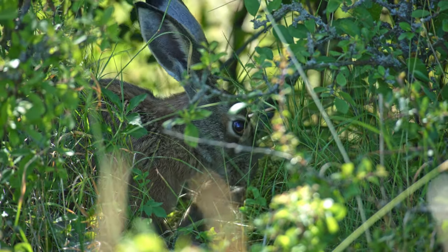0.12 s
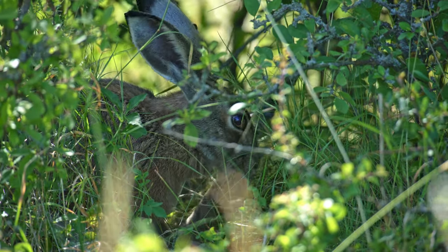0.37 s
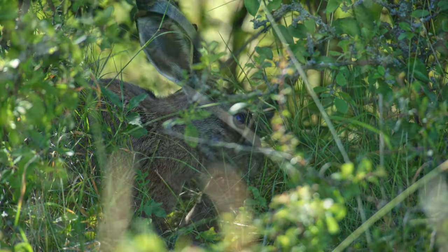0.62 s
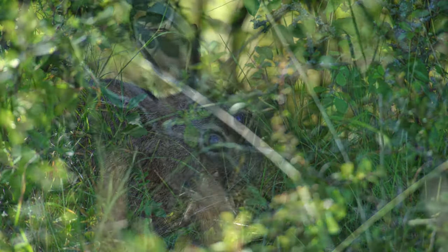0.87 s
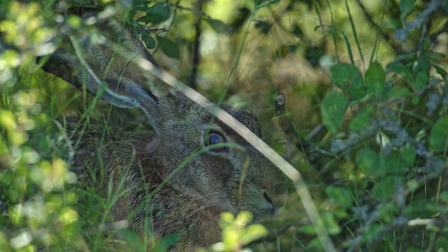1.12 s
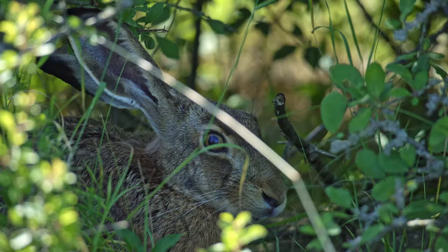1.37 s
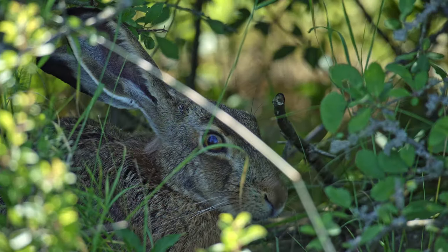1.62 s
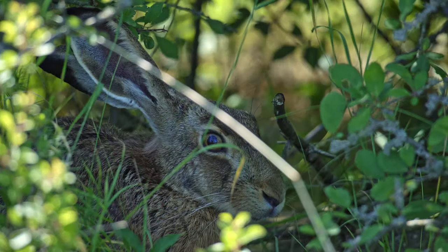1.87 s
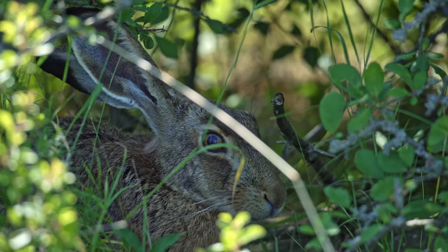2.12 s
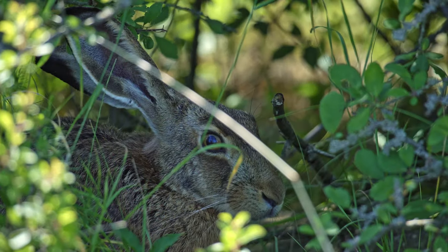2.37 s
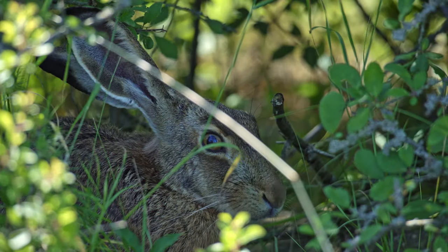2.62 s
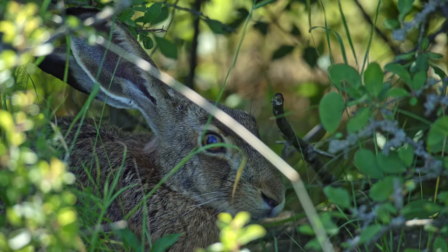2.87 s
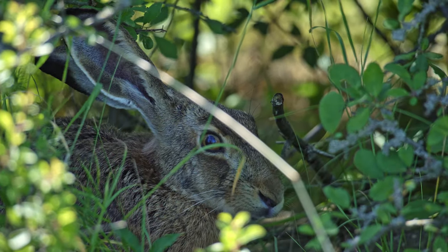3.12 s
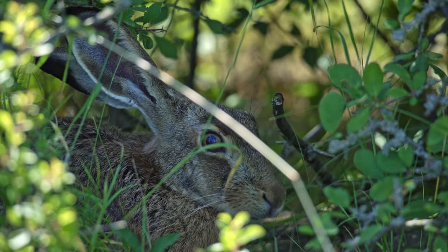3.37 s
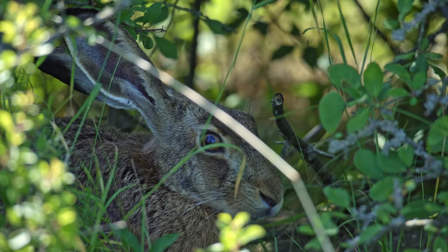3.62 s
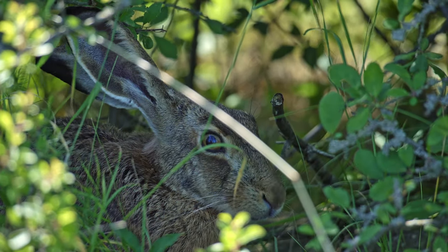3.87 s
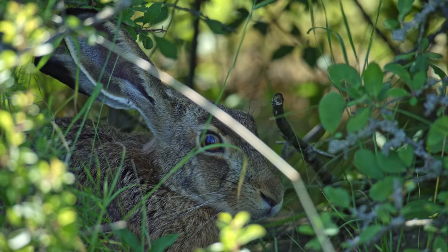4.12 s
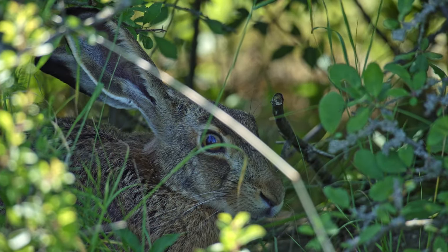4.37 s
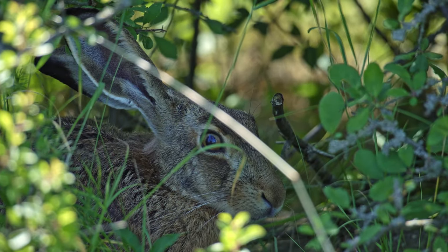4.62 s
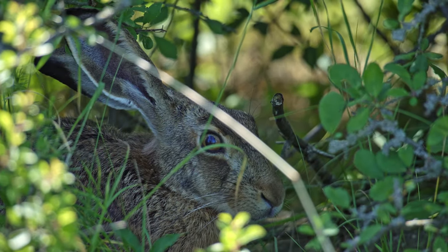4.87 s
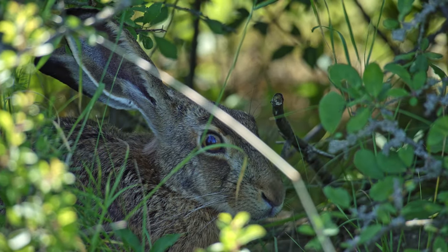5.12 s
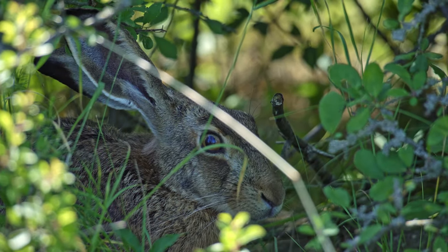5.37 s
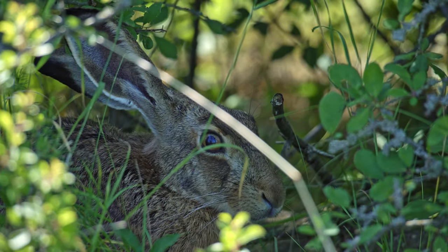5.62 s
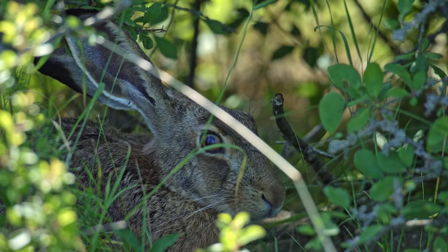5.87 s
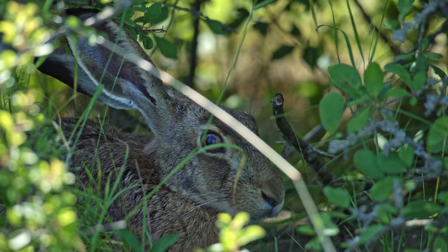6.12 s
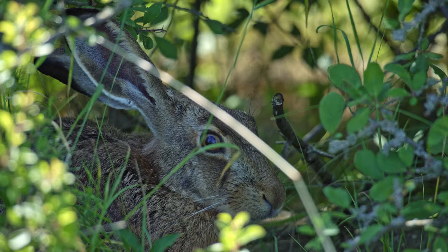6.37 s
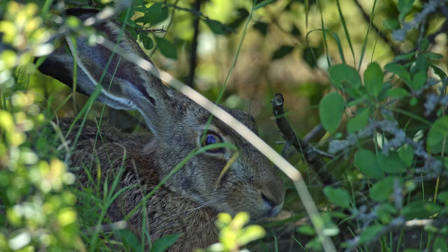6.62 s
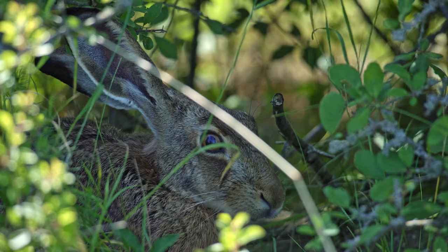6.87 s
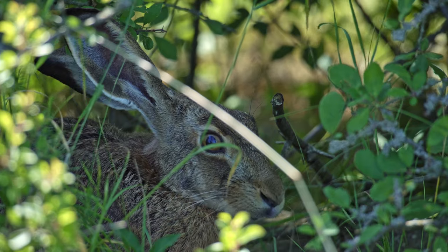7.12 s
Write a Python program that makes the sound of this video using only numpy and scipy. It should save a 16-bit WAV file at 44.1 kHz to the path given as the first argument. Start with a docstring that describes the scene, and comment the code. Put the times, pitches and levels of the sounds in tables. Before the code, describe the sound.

A lively birdsong scene beside a summer hedge, in stereo, with the singers on the left drifting slightly towards the middle. At 0-1 s a falling whistle, a soft warble and a quick chirruping trill lead to a swelling buzz. From 1 to 2 s come sharp chirps and a long descending trill. Between 2 and 3.6 s, rippling low trills, bright fast ones, arcing whistles and small pips follow closely. Around 3.6 s notes bounce up and down; by 3.9-4.7 s an earlier phrase returns. A tiny twig snap at 4.7 s precedes a faint grasshopper buzz, around 5-5.5 s. A dry rattle and falling swoop come at 5.5 s, then low whistles, and whipping notes at 6.3 s. Short trills continue to the end, 7.2 s. Wind rumbles in puffs, notably at 2-3.3 and 6-6.3 s, over quiet leaves and high cricket shimmer.

```python
"""Birdsong over a summer hedge

A lark and a lower-voiced songbird sing from the left in whistles, trills, warbles, a rattle and a swoop:
sines of gliding pitch with a weak octave; the bushes return a faint short echo, made by convolution with noise.
Gusts rumble on the microphones, leaves murmur and bush crickets shimmer at the top of hearing: shaped noise.
A grasshopper's faint buzz is narrow-band noise, and a snapping twig is two damped sines."""
import sys
import numpy as np
from scipy import signal
from scipy.fft import rfft, irfft
from scipy.io import wavfile
from scipy.ndimage import uniform_filter1d

SR = 44100
rng = np.random.default_rng(int(sys.argv[2]) if len(sys.argv) > 2 else 0)


def generate_wav(sig):
    """Save sig (samples, or channels by samples) to the path in sys.argv[1] as 16-bit PCM at SR."""
    pcm = np.round(np.clip(np.atleast_2d(sig).T, -1, 1) * 32767).astype(np.int16)
    wavfile.write(sys.argv[1], SR, pcm)


def volts_from_decibels(level):
    """Turn decibel levels (scalar or array-like) into linear amplitude factors."""
    exponent = np.asarray(level, float) / 20
    return 10 ** exponent


N = 319284  # samples in the scene


def colour(points, channels=1):
    """Spectral shaping: white noise takes the outline of (frequency_hz, density_db) points, at rms 1."""
    hz, db = np.transpose(points)
    log_hz = np.log(np.fft.rfftfreq(N, 1 / SR) + 1)
    gain = volts_from_decibels(np.interp(log_hz, np.log(hz), db))
    noise = irfft(rfft(rng.standard_normal((channels, N))) * gain, N)
    return noise / noise.std()


def walk(rate):
    """Slow random fluctuation: levels drawn rate times a second, slewed twice, with a spread near 1."""
    hold = int(SR / rate)
    steps = np.repeat(rng.standard_normal(N // hold + 1), hold)
    return 1.3 * uniform_filter1d(uniform_filter1d(steps, hold), hold)[:N]


def curve(table):
    """Linear interpolation: straight lines join (time_s, value) rows."""
    return np.interp(np.arange(N) / SR, *np.transpose(table))


def spread(pair, likeness):
    """Interchannel correlation: two unrelated noises become left and right of the given likeness."""
    likeness = np.clip(likeness, 0, 1)
    common = np.sqrt((1 + likeness) / 2) * pair[0]
    opposed = np.sqrt((1 - likeness) / 2) * pair[1]
    return common + opposed * np.array([[1], [-1]])


def along(length_ms):
    """Normalized time: progress 0-1 through a note."""
    return np.linspace(0, 1, int(length_ms * SR / 1000))


def bent(first_hz, last_hz, bend):
    """Pitch contour: the pitch at start, middle and end of a note or trill."""
    # how a pitch travels, by name of bend: share of the way done at half time (0-1), bow (share of mean pitch)
    bends = {"even": (0.53, 0), "early": (.85, 0), "late": (0.144, 0), "lean": (0.71, 0),
             "sag": (0.51, -0.046), "dip": (0.43, -0.15), "arch": (0.41, 0.17), "surge": (0.125, 0)}
    share, bow = bends[bend]
    middle_hz = first_hz + share * (last_hz - first_hz) + bow * (first_hz + last_hz) / 2
    return first_hz, middle_hz, last_hz


def sing(song, start_s, hz, size):
    """Interaural time and level difference: a sine with a weak octave reaches the right later and softer."""
    # the singers drift towards the middle: time_s, left_lead_ms
    lead = [(0, 0.097), (3, 0.076), (6.3, 0.053), (7.24, 0.023)]
    octave = volts_from_decibels(-38)
    at = int(start_s * SR)
    count = min(len(hz), N - at)
    hz, size = hz[:count], size[:count]
    phase = 2 * np.pi * (np.cumsum(hz) / SR + start_s * 1000)
    lag = 2 * np.pi * hz * np.interp(start_s, *np.transpose(lead)) / 1000
    shadow_db = -10 - 1.5 * lag  # the higher the pitch, the softer on the right
    for side, turn, db in ((0, phase, 0), (1, phase - lag, shadow_db)):
        song[side, at:at + count] += volts_from_decibels(db) * size * (np.sin(turn) + octave * np.sin(2 * turn))


def wind():
    """Turbulence: eddies buffet the microphones in puffs, the deepest nearly alike on both."""
    # gusts, before the quick puffs: time_s, level_db
    gust = [(0.0, -54), (0.91, -52), (0.95, -39), (1.33, -60), (1.59, -46), (1.77, -64), (1.95, -32),
            (2.18, -55), (2.34, -43), (2.4, -54), (2.58, -59), (2.68, -33), (2.72, -44), (2.82, -35),
            (3.08, -57), (3.29, -31), (3.67, -47), (4.6, -60), (4.76, -42), (4.9, -57), (5.58, -57),
            (5.68, -45), (5.83, -56), (5.99, -30), (6.15, -39), (6.19, -25), (6.25, -40), (6.31, -29),
            (6.57, -44), (6.66, -39), (7.0, -49), (7.24, -62)]
    # relative spectrum of the rumble: frequency_hz, density_db (per Hz)
    rumble = [(15, -19), (48, -1), (117, -4.5), (220, -21.5), (389, -39.5), (900, -80)]
    # upper rumble against the deep one, before its fluctuation: time_s, gain_db
    upper_gain = [(0, 1), (3.4, 1.5), (3.9, -10.5), (5.7, -12), (6.1, 2), (7.24, -3.5)]
    noise = colour(rumble, channels=2)
    deep = signal.sosfiltfilt(signal.butter(2, 90, fs=SR, output="sos"), noise)
    reach = volts_from_decibels(curve(upper_gain) + 3.58 * walk(25))
    puffs = volts_from_decibels(curve(gust) + 2.2 * walk(30))
    return puffs * (spread(deep, .96) + reach * spread(noise - deep, .65))


def leaves():
    """Diffuse field: foliage and far country murmur as noise almost unrelated between the sides."""
    # breeze in the leaves: time_s, level_db
    rustle = [(0, -63.5), (1, -61), (7.24, -61)]
    # relative spectrum of the murmur: frequency_hz, density_db (per Hz)
    foliage = [(47, -22), (80, -10), (318, -14), (1650, -24.5), (5570, -32), (11000, -34), (14300, -34),
               (22000, -120)]
    return volts_from_decibels(curve(rustle)) * spread(colour(foliage, channels=2), 0.08)


def crickets():
    """Amplitude modulation: wing noise throbs with tooth clicks, four to a stroke, four strokes to a chirp."""
    # bush crickets, before the throb and its -1.5 dB offset: time_s, level_db
    chorus = [(0, -73), (.88, -74), (.93, -62.5), (5.7, -68), (6.1, -59.5), (7.24, -66)]
    # relative spectrum of the wings: frequency_hz, density_db (per Hz)
    wings = [(6000, -28.5), (11000, -11.5), (13000, -6.5), (15200, 5.5), (16500, -11.5)]
    t = np.arange(N) / SR
    stroke = 2 * np.pi * (16.0 * t + 0.19 * walk(1.4))  # 16 strokes a second, slightly unsteady
    throb_db = 2.6 * np.cos(stroke) + 3.2 * np.cos(4 * stroke)
    throb_db += 1.6 * np.cos(stroke / 4 + 1.5) + 1.2 * walk(40)
    return volts_from_decibels(curve(chorus) + throb_db - 1.5) * spread(colour(wings, channels=2), .65)


def whistles(song):
    """Frequency modulation: each whistle or syllable is a tone gliding smoothly through its pitches."""
    # recurring syllables by name: (length_ms before the soft edges, pitch_hz at even steps ...),
    # then for each time it is sung: start_s, level_db
    syllables = { "slide": ((88.4, 4020, 3750, 3336), [(.0125, -46.5), (1.183, -33.5)]),
                 "caret": ((13.7, 2300, 3450, 2250), [(.9695, -53), (1.157, -41), (1.4225, -54.5),
                 (1.8125, -55.5), (1.9625, -49), (2.1475, -49), (2.4895, -50.5), (2.872, -46), (2.968, -49),
                 (3.224, -47), (5.3525, -54), (5.7295, -55), (5.8915, -54)]),
                 "high drop": ((11.5, 6540, 5900, 5400), [(1.813, -40.5), (3.9298, -31.5)]),
                 "tick": ((2.5, 3200, 2420, 2500), [(1.8445, -47.5), (1.8685, -44.5), (3.963, -40),
                 (3.988, -40)]), "upper fall": ((7.1, 5000, 4700, 4530), [(1.932, -34), (4.0565, -32)]),
                 "lower fall": ((36.2, 3600, 3324, 3700, 3450, 3490, 3450, 3150, 2480), [(1.952, -35.5),
                 (4.0747, -32)]), "lead-in": ((12, 3120, 3300, 3350), [(2.254, -46.5), (4.412, -47.5)]),
                 "flick": ((2.6, 4600, 3740, 2700), [(2.266, -47), (4.422, -42.5)]),
                 "arc": ((61.4, 3340, 4050, 3460), [(2.548, -32.5), (4.671, -33)]),
                 "top drop": ((11, 6800, 6120, 5750), [(2.712, -34), (3.043, -36)]),
                 "pip": ((2.9, 4000, 3920, 4600), [(2.7545, -35.5), (3.089, -39), (3.2845, -39)]),
                 "bridge": ((11, 5000, 4800, 4550), [(3.096, -50), (3.292, -56)]),
                 "hook": ((20.7, 4200, 3630, 3580), [(2.7765, -33), (3.112, -38.5)]),
                 "plunge": ((23.4, 4000, 3780, 2650), [(3.307, -39), (3.529, -33.5)]), }
    # whistles sung once: start_s, length_ms before the soft edges, first_hz, last_hz, level_db, bend
    single = [(0.194, 50, 1805, 1815, -50.5, "even"), (.435, 45, 1700, 1690, -59, "even"),
              (.496, 116, 2590, 2535, -49, "dip"), (.884, 40, 2480, 2720, -57, "early"),
              (.982, 6.8, 5940, 5470, -44, "early"), (0.997, 15, 6100, 4050, -40.5, "even"),
              (1.013, 24, 4820, 2690, -47, "lean"), (1.039, 29, 2700, 5170, -37.5, "early"),
              (1.346, 15, 5760, 6160, -44.5, "late"), (2.945, 18, 4500, 2400, -56, "early"),
              (3.399, 15, 5670, 5100, -40, "early"), (3.417, 25, 3760, 4800, -42.5, "early"),
              (3.5057, 9.7, 3600, 4730, -39, "even"), (3.769, 122, 2360, 1490, -49, "early"),
              (3.984, 89, 1884, 1900, -54, "even"), (4.056, 67, 2030, 1940, -51, "lean"),
              (4.34, 74, 1750, 1820, -52, "late"), (4.4332, 51, 1400, 1340, -53, "late"),
              (4.554, 53, 2400, 3030, -49, "late"), (4.635, 32.6, 3150, 2890, -45.5, "early"),
              (4.748, 60, 2275, 1960, -46.5, "late"), (4.8005, 14.6, 3580, 3460, -35.5, "early"),
              (4.817, 34.5, 3150, 2600, -41, "lean"), (4.958, 14, 3160, 3300, -45, "even"),
              (5.5945, 181, 1760, 1677, -48, "early"), (5.805, 14.8, 2650, 2830, -44.5, "late"),
              (5.829, 20.5, 2350, 2680, -40.5, "late"), (5.847, 127, 2350, 1920, -46, "late"),
              (5.94, 63, 1610, 1700, -51.5, "late"), (5.995, 70, 1760, 1997, -46.5, "early"),
              (6.079, 29.5, 4360, 3950, -37.5, "arch"), (6.162, 9.9, 3490, 2650, -40, "even"),
              (6.2514, 48, 2730, 2430, -48.5, "late"), (6.333, 162, 2610, 3010, -39, "surge"),
              (6.475, 56, 3060, 2344, -41, "early"), (6.628, 10, 3600, 3750, -45, "even"),
              (6.641, 5.7, 4600, 2600, -47, "even"), (6.78, 33.6, 4090, 3235, -38, "arch"),
              (7.058, 42, 5290, 5010, -40, "lean")]
    waver = 1 + .008 * walk(70)  # no whistle holds its pitch quite steady
    notes = [(start, ms, hz, db, 0) for (ms, *hz), sung in syllables.values() for start, db in sung]
    for start_s, ms, first_hz, last_hz, db, bend in single:
        rise_db = 20 if bend == "surge" else 0  # a surging whistle starts this much softer
        notes.append((start_s, ms, bent(first_hz, last_hz, bend), db, rise_db))
    for start_s, ms, hz, db, rise_db in notes:
        ms = ms + 3.7  # the soft edges
        u = along(ms)
        edge = np.minimum(1, np.minimum(u, 1 - u) * ms / (1.1 + 0.092 * ms))
        glide = np.interp(u, np.linspace(0, 1, len(hz)), hz)
        glide = uniform_filter1d(glide, len(u) // (len(hz) + 1), mode="nearest")
        glide = glide * waver[int(start_s * SR):][:len(u)]
        sing(song, max(start_s - .0015, 0), glide, volts_from_decibels(db - rise_db * (1 - u)) * edge)


def warbles(song):
    """Periodic frequency modulation: the pitch flicks up from a floor and sinks back."""
    # start_s, length_ms, floor_hz, first_swing_hz, last_swing_hz, swings_per_s, first_level_db, last_level_db
    flicks = [(.073, 126, 1758, 797, 170, 35.8, -55.5, -44), (4.801, 105, 1953, 296, 298, 44.5, -47, -50)]
    for start_s, ms, floor_hz, first_hz, last_hz, swings, first_db, last_db in flicks:
        u = along(ms)
        turn = 2 * np.pi * swings * u * ms / 1000
        depth_hz = first_hz + (last_hz - first_hz) * u
        swing_hz = depth_hz * ((1 + np.cos(turn + .5 * np.cos(turn) - .5)) / 2) ** 1.63
        edge = np.minimum(1, np.minimum(u, 1 - u) * 30)
        sing(song, start_s, floor_hz + swing_hz, volts_from_decibels(first_db + (last_db - first_db) * u) * edge)


def trills(song):
    """Pulse trains: one short sweep repeats at a steady or slowing rate while its mean pitch drifts."""
    # start_s, elements, period_ms (mean), first_hz, last_hz, level_db before the swell, kind of element
    runs = [(.1743, 16, 19.36, 5220, 4030, -43.7, "hooked"), (.5598, 30, 7.59, 3530, 3980, -33.5, "buzz"),
            (.7876, 8, 7.14, 3900, 2650, -37, "burr"), (.845, 4, 11, 2680, 2500, -45, "climb"),
            (1.912, 5, 4.2, 4850, 4800, -43, "whirr"), (4.0365, 5, 4.2, 4850, 4800, -40, "whirr"),
            (4.967, 5, 6.5, 2950, 2600, -49, "climb"), (1.1157, 3, 9.8, 5050, 5000, -40, "upper"),
            (1.1125, 3, 9.8, 4150, 4150, -50, "upper"), (1.3594, 17, 18.36, 5280, 3680, -33, "hooked"),
            (1.7607, 7, 4.8, 4950, 5050, -47.6, "whirr"), (2.0252, 12, 13.78, 2230, 2260, -44.9, "ripple"),
            (2.279, 7, 4.3, 4770, 5680, -44.9, "climb"), (2.3143, 13, 13.82, 5530, 5300, -34.7, "upper"),
            (2.335, 12, 13.78, 4450, 4600, -39, "lower"), (2.668, 5, 4.6, 5900, 5900, -51, "whirr"),
            (2.999, 5, 4.6, 6050, 6050, -45, "whirr"), (2.8185, 10, 12.8, 4700, 5050, -37.5, "wave"),
            (3.1605, 4, 17.4, 4780, 4800, -39.4, "wave"), (3.4375, 4, 8.9, 5020, 5300, -37.8, "climb"),
            (3.598, 4, 44.25, 2300, 2120, -45, "held"), (3.628, 5, 44.06, 3010, 2800, -38.7, "up"),
            (3.6379, 4, 44.25, 3050, 3050, -36.5, "down"), (3.645, 3, 44.3, 3280, 3280, -43, "held"),
            (3.8756, 7, 5.07, 4860, 4910, -34.3, "whirr"), (4.1512, 14, 13.51, 2100, 2300, -49, "ripple"),
            (4.4351, 7, 4.39, 4750, 5740, -40, "climb"), (4.485, 11, 13.83, 5450, 5150, -32.5, "upper"),
            (4.4785, 11, 13.8, 4380, 4600, -39, "lower"), (5.0035, 10, 14.3, 2250, 2050, -57, "rake"),
            (5.163, 6, 11.1, 3160, 3050, -41.4, "bead"), (6.033, 4, 7.8, 3250, 3540, -39.9, "bead"),
            (6.14, 3, 8, 3550, 3520, -36, "held"), (6.194, 3, 27.5, 2150, 2200, -55, "upper"),
            (6.553, 2, 12, 2400, 2400, -54, "held"), (6.3106, 13, 19.25, 4450, 4400, -29.5, "lash"),
            (6.655, 3, 16.8, 2660, 2760, -42.2, "bead"), (6.7426, 4, 11.1, 3870, 4050, -36.1, "bead"),
            (6.814, 5, 27.6, 2000, 1850, -62, "rake"), (7.0048, 4, 10.6, 3880, 4050, -45.9, "bead"),
            (7.129, 3, 38.5, 3750, 3330, -37.1, "droop"), (7.1477, 3, 39.67, 3850, 3850, -34, "lift")]
    # by kind: sweep_hz, hook_hz at both ends, sounding share of a period (0-1), bend of the whole trill
    elements = {"hooked": (-420, 620, .92, "even"), "buzz": (600, 0, .88, "early"),
                "burr": (350, 0, .9, "even"), "ripple": (-600, 250, 1, "even"),
                "upper": (600, 0, .33, "early"), "lower": (450, 0, .55, "early"),
                "wave": (800, 350, 1, "lean"), "whirr": (594, 0, .68, "sag"),
                "climb": (-600, 0, .55, "early"), "lash": (-950, -650, .45, "even"),
                "bead": (-150, -350, .68, "early"), "up": (2000, 0, .18, "late"),
                "down": (-1900, 0, .18, "even"), "held": (0, 0, .7, "early"),
                "droop": (-380, -180, .55, "early"), "lift": (900, 0, .2, "early"),
                "rake": (-900, 750, .7, "early")}
    # kinds that strike hard: slowing (0-1), softness of an element's edges (0-1)
    struck = {"lash": (.055, .5)}
    for start_s, count, period_ms, first_hz, last_hz, db, kind in runs:
        sweep_hz, hook_hz, share, bend = elements[kind]
        slowing, soft = struck.get(kind, (0, .71))
        u = along(count * period_ms)
        period = count * (u + slowing * u * (1 - u)) % 1
        element = np.minimum(period / share, 1)
        # a parabola through the three pitches of the whole trill
        arch = np.polyval(np.polyfit([0, .5, 1], bent(first_hz, last_hz, bend), 2), u)
        stroke = sweep_hz * (element - .5) + hook_hz * (2 * element - 1) ** 4
        swell = 0.69 + 0.5 * np.sin(np.pi * u) ** .5  # a trill gathers force and tires
        rise_db = 10 if kind == "buzz" else 0  # a buzz starts this much softer
        size = volts_from_decibels(db - rise_db * (1 - u)) * swell * np.abs(np.sin(np.pi * element)) ** soft
        sing(song, start_s, arch + stroke, size)


def twig(at_s=4.7345, hz=2300, t60_s=0.001):
    """Damped free vibration: a blow and a weaker rebound ring the wood for an instant."""
    t = np.arange(N) / SR
    snap = np.zeros(N)
    for delay_s, db in ((0, -20), (.0022, -34)):
        since = np.maximum(t - at_s - delay_s, 0)
        snap += volts_from_decibels(db) * np.sin(2 * np.pi * hz * since) * volts_from_decibels(-60 * since / t60_s)
    return snap


def grasshopper(start_s=4.99, end_s=5.55, hz=5300, width_hz=260):
    """Band-pass filtering: narrow noise makes a short faint buzz in the grass."""
    t = np.arange(N) / SR
    band = signal.butter(2, [hz - width_hz / 2, hz + width_hz / 2], "band", fs=SR, output="sos")
    buzz = signal.sosfilt(band, rng.standard_normal(N))
    swell = np.clip(np.minimum(t - start_s, end_s - t) / 0.5, 0, 1)  # turns back at 0.56
    return volts_from_decibels(-64) * buzz / buzz.std() * swell


def rattle(song):
    """Joint amplitude and frequency modulation: steep pulses whose reach in pitch swings."""
    # start_s, length_ms, floor_hz, swing_hz (scale of the reach), swings_per_s, pulses_per_s, level_db (base)
    pulse_train = (5.453, 253, 3100, 1900, 24.7, 87, -42)
    start_s, ms, floor_hz, swing_hz, swings, pulses, db = pulse_train
    s = along(ms) * ms / 1000
    pulse = pulses * s % 1
    held = (s - pulse / pulses) + .5 / pulses  # each pulse keeps the reach of its middle
    swing = .1 + .65 * np.abs(np.cos(np.pi * swings * (held - .0175))) ** 1.4
    swing = swing * (1 + held)  # the reach grows
    flutter = .72 + .3 * np.cos(2 * np.pi * 330 * s + 2 * walk(200)[:len(s)])  # the pitch whips up and down
    fade = np.minimum(1, (s[-1] - s) * 40)
    size = volts_from_decibels(db + 3 * swing) * (.12 + np.sin(np.pi * pulse ** .8) ** 3) * fade
    sing(song, start_s, floor_hz + swing_hz * swing * flutter, size)


def swoop(song):
    """Exponential relaxation: one long note falls and settles on a held pitch as it swells."""
    # start_s, length_ms, first_hz, last_hz, settling_ms, swelling_ms, level_db
    long_note = (5.5, 106, 5950, 3740, 12.5, 32, -34)
    start_s, ms, first_hz, last_hz, settle_ms, swell_ms, db = long_note
    t_ms = along(ms) * ms
    glide = last_hz + (first_hz - last_hz) * np.exp(-t_ms / settle_ms)
    size = volts_from_decibels(db) * (1 - np.exp(-t_ms / swell_ms)) * np.minimum(1, (ms - t_ms) / 10)
    sing(song, start_s, glide, size)


def bushes(song):
    """Reverberation: convolution with decaying noise returns a faint echo, weaker on the right."""
    echo_db, right_db, t60_s, onset_s = -22.5, -8, 0.6, 0.0047
    t = np.arange(SR // 2) / SR
    response = rng.standard_normal((2, len(t))) * volts_from_decibels(-60 * t / t60_s) * np.minimum(t / onset_s, 1)
    response /= np.sqrt((response ** 2).sum(1, keepdims=True))
    echo = signal.fftconvolve(song[:1], response, axes=1)[:, :N]
    return volts_from_decibels(echo_db + np.array([[0], [right_db]])) * echo


def birds():
    """Superposition: all the song, under one uneven breath pressure, joins its echo from the bushes."""
    song = np.zeros((2, N))
    for voice in (whistles, warbles, trills, rattle, swoop):
        voice(song)
    song *= volts_from_decibels(1.3 * walk(120))  # breath pressure is never quite even
    return song + bushes(song)


def scene():
    """Superposition: the pressures of all sources add at the two microphones."""
    return wind() + leaves() + crickets() + birds() + twig() + grasshopper()


def top_cut(x):
    """Nothing passes above the cut-off."""
    return signal.sosfilt(signal.butter(12, 16830, fs=SR, output="sos"), x)


def record(dry):
    """Low-pass filtering: a steep elliptic filter removes the very top."""
    low_pass = signal.ellip(12, .2, 70, 15850, fs=SR, output="sos")  # ripple dB, stopband dB, edge Hz
    mix = signal.sosfilt(low_pass, dry)
    return top_cut(mix)


dry = scene()
out = record(dry)
generate_wav(out)
```